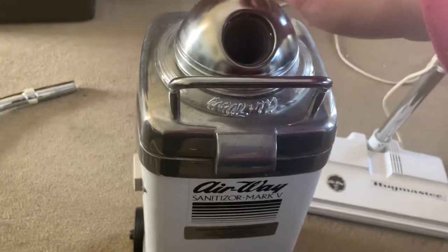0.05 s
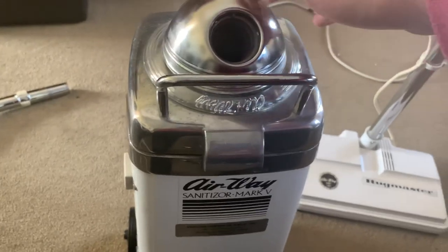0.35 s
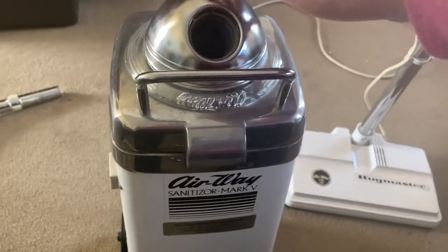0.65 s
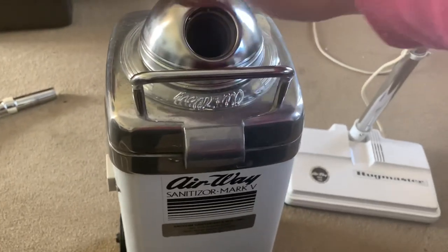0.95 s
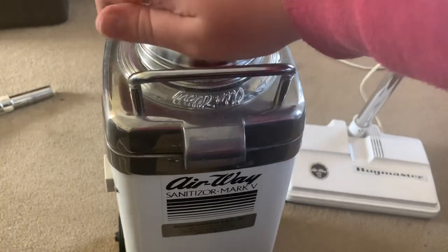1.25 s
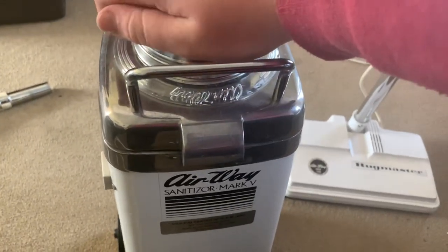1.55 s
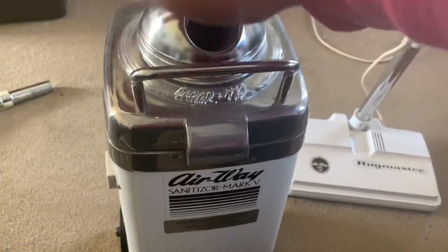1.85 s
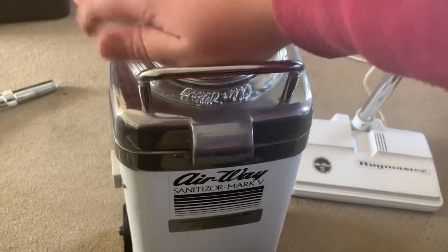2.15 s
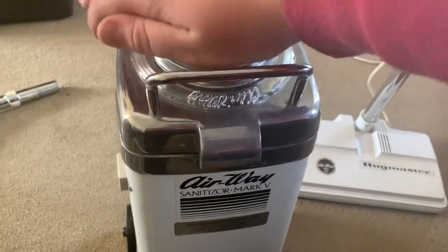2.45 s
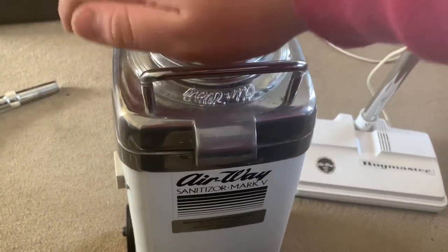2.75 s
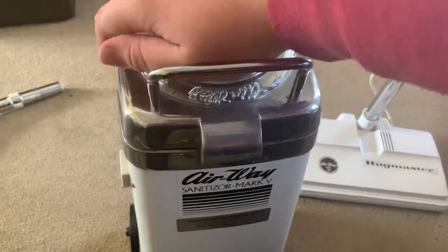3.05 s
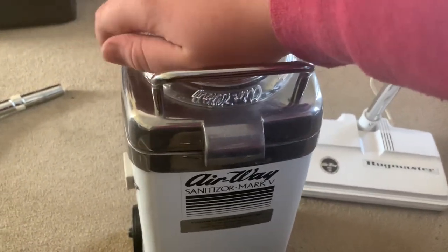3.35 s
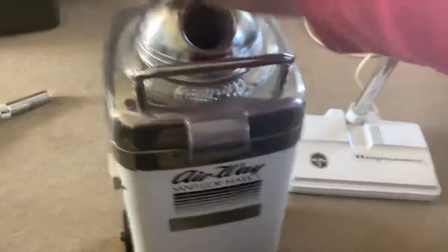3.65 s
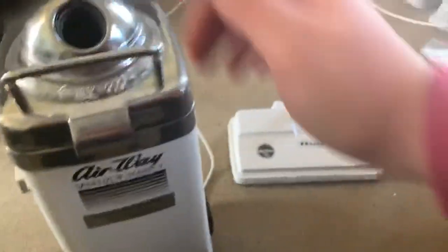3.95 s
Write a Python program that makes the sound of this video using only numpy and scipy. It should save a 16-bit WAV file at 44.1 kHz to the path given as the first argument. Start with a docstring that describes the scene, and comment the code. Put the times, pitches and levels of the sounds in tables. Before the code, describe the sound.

A vacuum cleaner starts and roars, thinning to a hiss as a hand blocks it thrice.

```python
"""Vacuum cleaner with a sealed inlet

A canister vacuum cleaner is switched on close by in a carpeted room, and its fan whines up to speed.
Turbulent air roars through the open inlet. Three times a palm seals it: the roar gives way to a thin
leak hiss and the unloaded motor speeds up. A jet spits through the narrow gap each time the hand
lands or lifts; now and then the inlet briefly whistles or thumps."""
import sys
import numpy as np
from scipy import signal
from scipy.fft import rfft, irfft
from scipy.io import wavfile

SR = 44100
rng = np.random.default_rng(int(sys.argv[2]) if len(sys.argv) > 2 else 0)


def unload_wav(signal):
    """Save mono or channel-first audio to the path in sys.argv[1] as 16-bit WAV at rate SR, clipped to [-1, 1]."""
    wavfile.write(
        sys.argv[1],
        SR,
        np.round(np.clip(np.atleast_2d(signal).T, -1, 1) * 32767).astype(np.int16),
    )


N = 176400

# palm on the inlet: (sealed at [s], closing time [s], lifted at [s], opening time [s], leak gain [dB])
PALM_SEALS = [(1.355, .1, 1.703, .02, 2.5), (2.183, .04, 2.538, .025, 0), (3.025, .06, 3.6, .06, 0)]
# motor speed, as the pitch of the upper whine line: (time [s], frequency [Hz])
FAN_PITCH = [(.265, 490), (.42, 5000), (.56, 7280), (.75, 8620), (1.0, 9020), (1.15, 9240), (1.69, 10040),
             (1.78, 9930), (1.92, 9400), (2.17, 9160), (2.53, 10120), (2.66, 9780), (3.0, 9310),
             (3.58, 10270), (3.72, 9910), (3.85, 9440), (4.0, 9370)]
# loudness of the whine: (time [s], upper line [dB], lower lines [dB])
WHINE_LEVELS = [(.3, -75, -75), (.68, -49, -45), (.85, -34, -35.5), (1.0, -27, -33), (1.13, -30.5, -33.5),
                (1.22, -48, -48), (1.68, -50, -52), (1.83, -36, -43), (2.05, -56, -50), (2.65, -39, -45),
                (3.0, -57, -50), (3.55, -52, -50), (3.67, -34.5, -40), (4.0, -44, -40)]
# lower lines of the whine: (frequency ratio to the upper line, gain [dB])
LOWER_WHINE = [(.82, 0), (.72, -3.5), (.55, -5), (.36, -3)]
# loudness as heard, swelling at start-up, then easing: (time [s], roar gain [dB], rush gain [dB])
ROAR_LOUDNESS = [(.265, -9, -51), (.35, -13.5, -18.5), (.5, 3, 0.5), (.67, 3, 3.5), (1.0, 5, 5.5),
                 (1.2, 3.5, 3.5), (1.3, 5.5, 5.5), (1.74, -0.5, 3.5), (2.1, 0, -0.5), (2.58, 0.5, 2),
                 (2.95, -.5, -0.5), (3.64, 0.5, 2.5), (4.0, -2.5, -0.5)]
# loudness of the drone as heard, swelling at start-up, then easing: (time [s], gain [dB])
DRONE_LOUDNESS = [(.265, -1), (.4, 4), (.7, 5.5), (1.3, 7), (1.6, 4), (2.3, 2), (4.0, 2)]
# jets under the hand: (time [s], rise [s], fall [s], body gain [dB], hiss gain [dB])
JETS = [(1.32, .06, .04, -1, -5.5), (1.704, .022, .017, .5, 2), (2.168, .016, .014, -1.5, -13),
        (2.544, .023, .015, 4, -2), (3.003, .016, .017, -3, -16), (3.53, .04, .04, -14, -13),
        (3.6, .034, .026, -3, -4.5)]
# inlet tones: (time [s], half length [s], frequency [Hz], glide [Hz/s], level [dB])
PIPE_TONES = [(0.549, .031, 3615, 1100, -14.5), (1.28, .03, 960, 100, -24),
              (3.009, 0.006, 3630, 3.6, -28.5)]
# low pulses: (time [s], half length [s], frequency [Hz], level [dB])
PULSES = [(.299, 0.015, 110, -27), (1.15, 0.019, 55, -41), (1.388, 0.021, 62, -37), (1.472, .02, 48, -37),
          (1.74, .018, 49.4, -43), (3.03, 0.013, 74.93, -32)]
# resonances of the canister, the two lowest rows a steady hum: (frequency [Hz], width [Hz], boost [dB])
CANISTER_MODES = [(114, 14, 3.5), (225.3, 17, 5), (344.5, 24, 7.5), (427, 9.9, 3), (530.4, 16, 2),
                  (616, 28, 3.5), (780, 37, 2.5), (845, 8.9, 3), (983, 15, 5.5), (2514, 26, 7),
                  (3530, 39, -6), (4130, 210, -5), (5260, 110, 1), (6550, 140, -0.5)]
# modes of the metal casing: (frequency [Hz], level [dB], time to fall 60 dB [s])
CASING_MODES = [(870, -28, 0.21), (2546, -33, 0.1)]

# noise spectra before gains and resonances: (frequency [Hz], spectral level [dB])
ROOM_SPECTRUM = [(20, -108), (55, -80.5), (110, -95), (240, -82), (350, -99), (900, -101), (1450, -91),
                 (3000, -101), (4000, -122)]
TICK_SPECTRUM = [(3000, -115), (8000, -96), (11500, -78), (15000, -104)]
SNAP_SPECTRUM = [(400, -82), (900, -48), (2200, -41), (3600, -50.5), (5400, -53), (7400, -58), (11200, -47),
                 (13000, -59), (15800, -56)]
SNAP_BODY_SPECTRUM = [(60, -73), (220, -62), (900, -54.5), (2400, -56.5), (3500, -67), (11000, -80)]
HOUSING_SPECTRUM = [(25, -113), (60, -77), (120, -67.5), (170, -70.5), (235, -63), (330, -63), (420, -70),
                    (700, -67.5), (1100, -71.5), (1600, -71), (2800, -82.5), (6000, -93.5), (15000, -97)]
JET_BODY_SPECTRUM = [(60, -72), (250, -57.5), (500, -60), (960, -47.5), (1150, -55), (1500, -55),
                     (1950, -57.5), (2450, -53.5), (2900, -57.5), (3700, -64), (4300, -62.5), (9000, -84)]
JET_HISS_SPECTRUM = [(2000, -98), (4500, -74.5), (7000, -55), (8200, -56), (9200, -51), (11500, -60),
                     (15800, -63)]
LEAK_SPECTRUM = [(1200, -89), (2000, -80.5), (2400, -71), (2800, -79), (3400, -71), (4650, -72),
                 (5250, -79), (5800, -68), (6300, -72.5), (7150, -67), (7650, -77), (8300, -75),
                 (9500, -64), (10600, -67.5), (12700, -71.5), (14000, -68.5), (15800, -72.5)]
HOLLOW_SPECTRUM = [(800, -110), (1330, -52.5), (1600, -52.5), (2600, -110)]
ROAR_SPECTRUM = [(25, -108), (70, -66.5), (120, -67.5), (170, -62), (230, -59), (420, -58.5), (560, -56.5),
                 (660, -54.5), (830, -53.5), (1080, -58), (1600, -63.5), (2000, -68.5), (5000, -91.5)]
RUSH_SPECTRUM = [(800, -91), (2200, -79), (2900, -70), (3300, -66), (4000, -67), (4700, -69.5),
                 (5100, -74.5), (7100, -69.5), (8300, -81), (9700, -72), (10400, -73), (13000, -76),
                 (15800, -81)]

# likeness of left and right: (frequency [Hz], coherence [0-1])
COHERENCE = [(30, .92), (120, .98), (330, .975), (520, .88), (700, .48), (900, .62), (1100, .48),
             (1500, .8), (2000, .55), (2700, .8), (3600, .55), (5200, .2), (6500, .6), (7500, .75),
             (8400, .99), (9700, .8), (15600, .85)]
# phase by which left leads right: (frequency [Hz], phase [rad])
LEFT_LEAD = [(30, 0), (300, .08), (560, .4), (800, -.7), (1050, 0), (1350, 1.5), (2100, 1.9), (2800, 2.7),
             (3400, 2.2), (4100, .4), (6000, -.1), (7400, -1.3), (8000, -2.9), (8900, -3.4), (10500, -6),
             (11600, -6.6), (12700, -9), (14200, -9.9), (15400, -12.4)]
# left level minus right: (frequency [Hz], level difference [dB])
BALANCE = [(30, 6), (300, -0.9), (600, 4), (800, 1.5), (1100, -1), (1500, 5.5), (2000, 0.5), (2600, -1.5),
           (3400, 1.5), (4200, -0.5), (5300, -5.5), (6800, -0.5), (8000, -1)]

SWITCH_S, TICK_S = .265, .2175
TIME, FREQS = np.arange(N) / SR, np.fft.rfftfreq(N, 1 / SR)


def amp(db):
    """Amplitude grows tenfold for every 20 dB."""
    return 10 ** (np.asarray(db) / 20)


def curve(table, column=1):
    """Linear interpolation of one column in time."""
    columns = np.transpose(table)
    return np.interp(TIME, columns[0], columns[column])


def at_frequency(table, hz):
    """Linear interpolation on a log-frequency axis."""
    points, values = np.transpose(table)
    return np.interp(np.log(hz + 1), np.log(points), values)


def wander(rate_hz):
    """Low-passed noise: a random fluctuation of unit variance."""
    drift = irfft(rfft(rng.standard_normal(N)) * np.exp(-(FREQS / rate_hz) ** 2), N)
    return drift / drift.std()


def stereo_phase(hz, waver_hz=0):
    """Phase is the integral of frequency; left and right are offset according to pitch."""
    phase = 2 * np.pi * np.cumsum(hz + waver_hz) / SR
    return np.array([phase, phase - at_frequency(LEFT_LEAD, hz)])


def noise(spectrum, modes=CANISTER_MODES):
    """Partly coherent stereo noise, coloured by resonance in the given modes."""
    left, independent = rng.standard_normal((2, len(FREQS))) + 1j * rng.standard_normal((2, len(FREQS)))
    coherence = np.clip(at_frequency(COHERENCE, FREQS), 0, 1)
    right = coherence * left + np.sqrt(1 - coherence ** 2) * independent
    right *= np.exp(-1j * at_frequency(LEFT_LEAD, FREQS))
    db = at_frequency(spectrum, FREQS)
    db += sum(boost / (1 + (2 * (FREQS - hz) / width) ** 2) for hz, width, boost in modes)
    pan_db = at_frequency(BALANCE, FREQS) / 2
    return irfft(np.array([left * amp(db + pan_db), right * amp(db - pan_db)]), N) * np.sqrt(SR * N) / 2


def seals():
    """The palm obstructs the flow: one row for each seal, from 0 (open) to 1 (shut)."""
    return np.array([np.clip((TIME - on) / closing + .5, 0, 1) * np.clip((off - TIME) / opening + .5, 0, 1)
                     for on, closing, off, opening, _ in PALM_SEALS])


def room_tone():
    """Ambient noise: a faint, steady floor, strongest in the bass."""
    return noise(ROOM_SPECTRUM, modes=())


def reflections(sound, length=1500, decay_s=.019, low_cut_hz=604, gain_db=-13.5):
    """Early reflection: floor and walls return sparse, decaying echoes of all but the bass."""
    taps = rng.standard_normal((2, length)) * (rng.random((2, length)) < .1)
    taps *= np.exp(-TIME[:length] / decay_s)
    taps = signal.sosfilt(signal.butter(2, low_cut_hz, "high", fs=SR, output="sos"), taps)
    taps /= np.linalg.norm(taps, axis=1, keepdims=True)
    return amp(gain_db) * signal.oaconvolve(sound, taps, axes=1)[:, :N]


def switch():
    """Impact excitation: a tick, then a snap that rings the casing; canister and room answer briefly."""
    def burst(spectrum, at, fall_s, rise_s=.0013):
        age = np.maximum(TIME - at, 0)
        return noise(spectrum) * np.minimum(age / rise_s, 1) * np.exp(-age / fall_s)
    tick = burst(TICK_SPECTRUM, TICK_S, fall_s=.004)
    snap = burst(SNAP_SPECTRUM, SWITCH_S, fall_s=.0032)
    body = burst(SNAP_BODY_SPECTRUM, SWITCH_S, fall_s=.039)
    age = np.maximum(TIME - SWITCH_S, 0)
    ring = sum(amp(db - 60 * age / t60) * np.sin(2 * np.pi * hz * age) for hz, db, t60 in CASING_MODES)
    return tick + snap + body + ring


def thumps():
    """Pressure pulses: the starting jolt and the pressure under the hand give a few low cycles."""
    pulses = 0
    for at, half, hz, db in PULSES:
        t = TIME - at
        pulses += amp(db) * np.exp(-(t / half) ** 2) * np.sin(2 * np.pi * hz * t)
    return np.sqrt(2) * pulses


def inlet_whistle(waver_hz=9, octave_db=-27, balance_db=-5.5):
    """Pipe tones: the inlet whistles at a critical flow speed and hoots under the cupped hand."""
    tones = 0
    for at, half, hz, glide, db in PIPE_TONES:
        t = TIME - at
        phase = stereo_phase(hz + glide * t, waver_hz * wander(rate_hz=120))
        envelope = amp(db) * np.exp(-abs(t / half) ** 2.2)
        tones += envelope * (np.sin(phase) + amp(octave_db) * np.sin(2 * phase))
    return np.sqrt(2) * tones * amp([[balance_db / 2], [-balance_db / 2]])


def housing_drone():
    """Radiation from the motor housing: a low noise that persists when the inlet is shut."""
    return noise(HOUSING_SPECTRUM) * amp(curve(DRONE_LOUDNESS))


def fan_whine(upper_width_hz=85, lower_width_hz=180):
    """Narrow-band turbulence: each line's frequency is proportional to the motor speed."""
    def line(hz, width_hz, db):
        phase = stereo_phase(hz)
        return amp(db) * (wander(width_hz) * np.sin(phase) + wander(width_hz) * np.cos(phase))
    pitch, lower_db = curve(FAN_PITCH), curve(WHINE_LEVELS, column=2)
    lower = sum(line(ratio * pitch, lower_width_hz, lower_db + db) for ratio, db in LOWER_WHINE)
    return line(pitch, upper_width_hz, curve(WHINE_LEVELS)) + lower


def leak_hiss():
    """Leakage flow: air hisses thinly past the sealing palm."""
    gain = sum(seal * amp(leak_db) for seal, (*_, leak_db) in zip(seals(), PALM_SEALS))
    return noise(LEAK_SPECTRUM) * gain


def gap_jets(sealed, pinch_db=5):
    """Jet noise: fast air spits while the gap under the hand is narrow, hissing most when pinched."""
    body = hiss = 0
    for at, rise, fall, body_db, hiss_db in JETS:
        swell = np.exp(-abs((TIME - at) / np.where(TIME < at, rise, fall)) ** 1.4)
        body += swell ** 1.8 * amp(body_db)  # briefer: the low body needs a wider gap than the hiss
        hiss += swell * amp(hiss_db)
    hiss *= amp(pinch_db * (sealed - .5))
    return noise(JET_BODY_SPECTRUM) * body + noise(JET_HISS_SPECTRUM) * hiss


def eddies(flow, bands=7, lowest_hz=200, band_db=.68, overall_db=.5):
    """Amplitude modulation by eddies: the stream flutters as a whole and in each octave."""
    octave = np.clip(np.log2((FREQS + 1) / lowest_hz), 0, bands - 1)
    spectrum, fluttering = rfft(flow), 0
    for k in range(bands):
        band = irfft(spectrum * np.maximum(1 - abs(octave - k), 0), N)
        fluttering += band * amp(band_db * wander(rate_hz=26))
    return fluttering * amp(overall_db * wander(rate_hz=24.7))


def inlet_roar():
    """Turbulent intake: a roar, a treble rush and a hollow ring that grows steeply with motor speed."""
    pitch = curve(FAN_PITCH)
    hollow = noise(HOLLOW_SPECTRUM) * (pitch / pitch.max()) ** 4.5
    roar = (noise(ROAR_SPECTRUM) + hollow) * amp(curve(ROAR_LOUDNESS))
    rush = noise(RUSH_SPECTRUM) * amp(curve(ROAR_LOUDNESS, column=2))
    return roar + rush


def scene():
    """Superposition: the cleaner's sources and their echoes add over the quiet room."""
    running, sealed = TIME > SWITCH_S, seals().sum(0)
    airflow = (housing_drone() + leak_hiss() + inlet_roar() * (1 - sealed)) * running
    turbulence = eddies(airflow + gap_jets(sealed))
    cleaner = switch() + thumps() + inlet_whistle() + fan_whine() * running + turbulence
    return room_tone() + reflections(cleaner) + cleaner


def record(dry, cutoff_hz=15790):
    """Band limiting: a steep low-pass filter removes the highest treble."""
    low_pass = signal.firwin(511, cutoff_hz, window=("kaiser", 9), fs=SR)
    return signal.oaconvolve(dry, low_pass[None], "same")


dry = scene()
out = record(dry)
unload_wav(out)
```